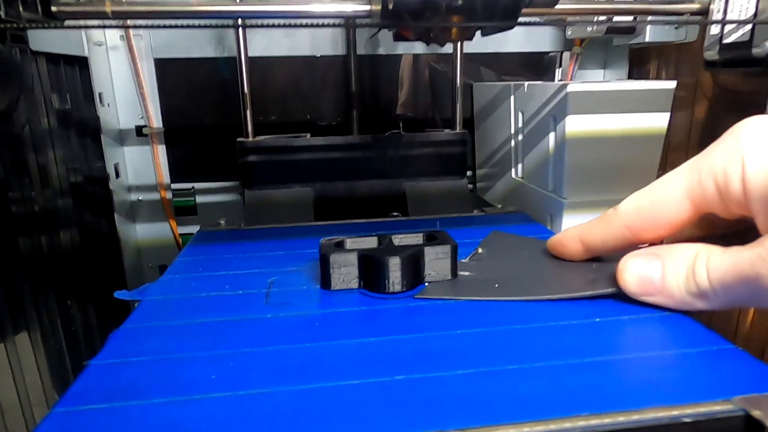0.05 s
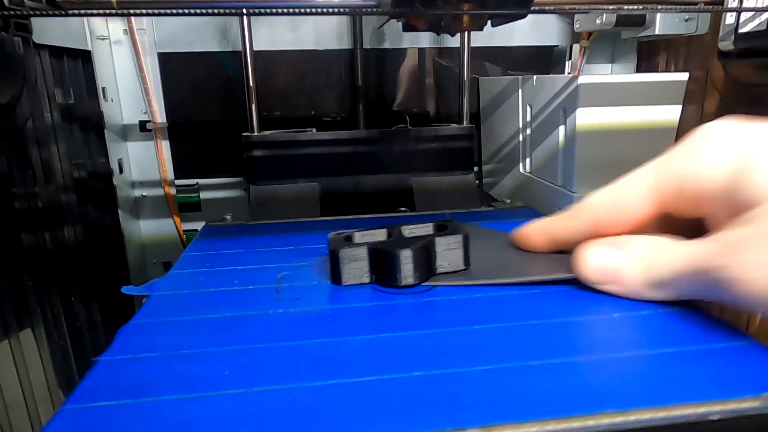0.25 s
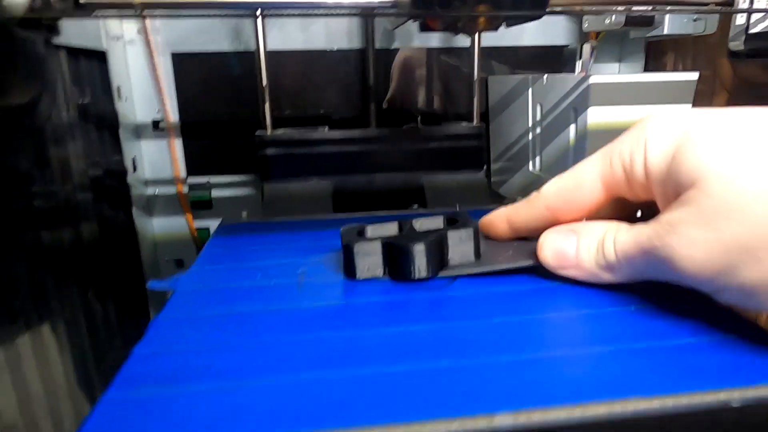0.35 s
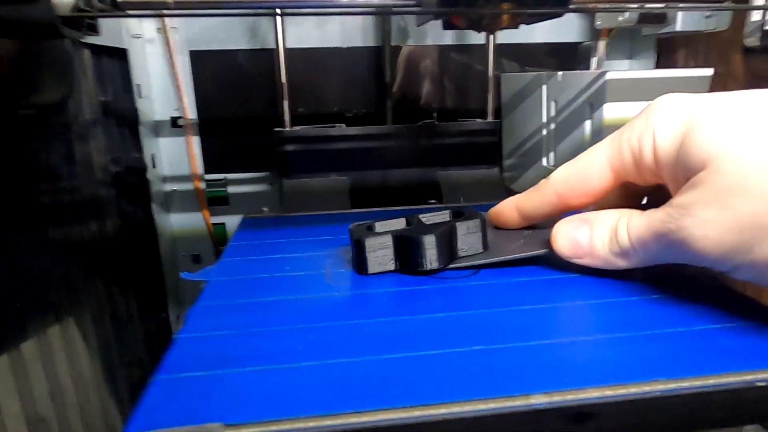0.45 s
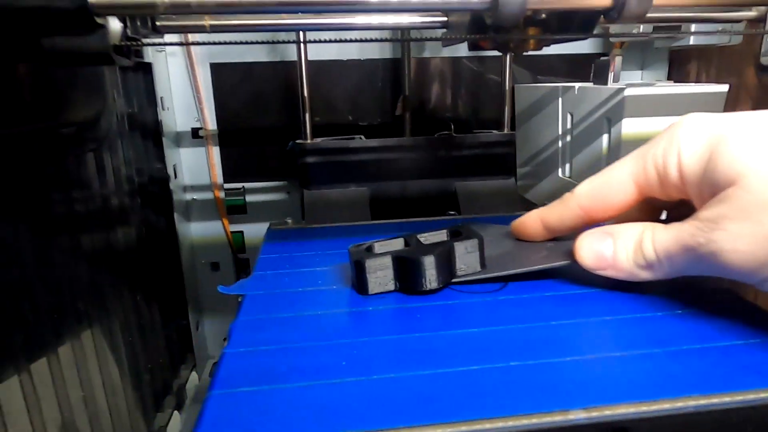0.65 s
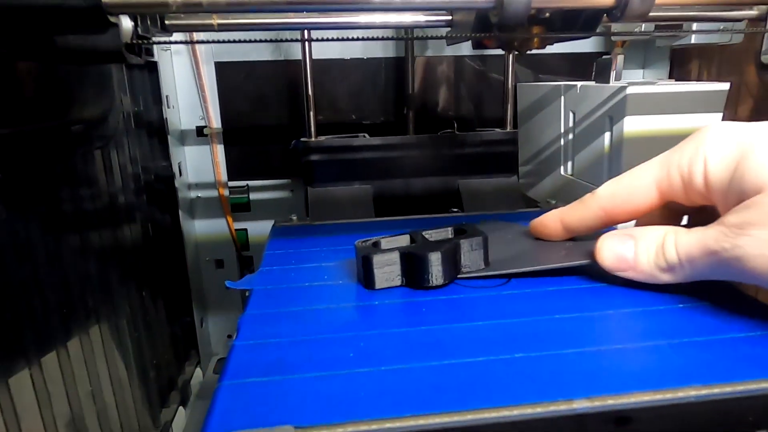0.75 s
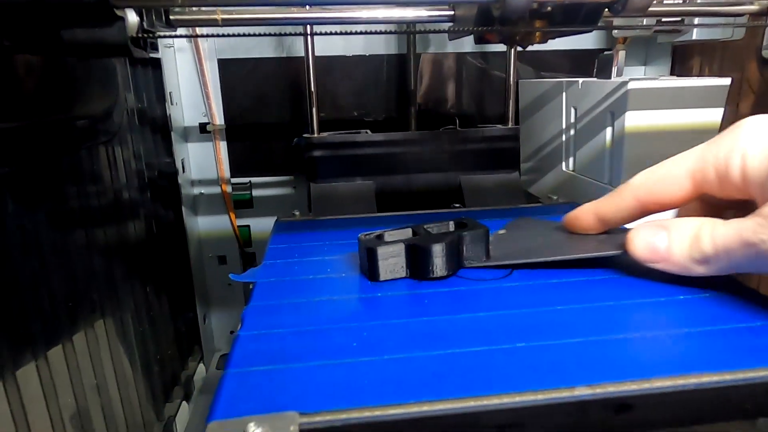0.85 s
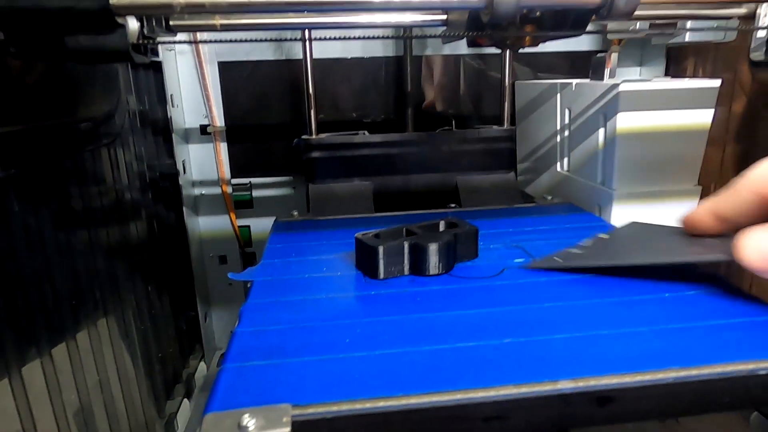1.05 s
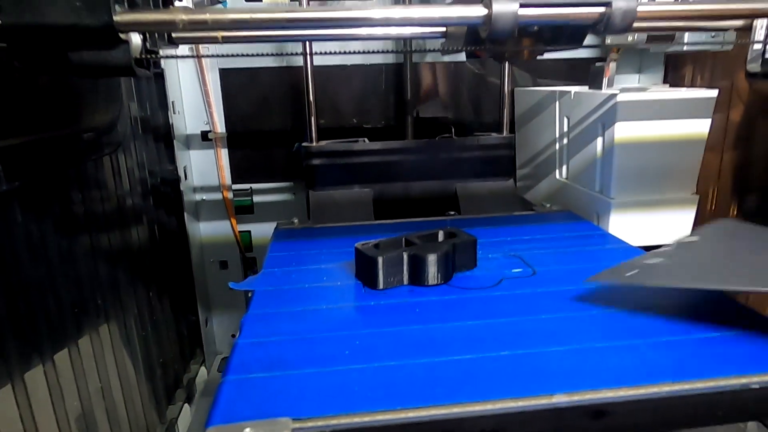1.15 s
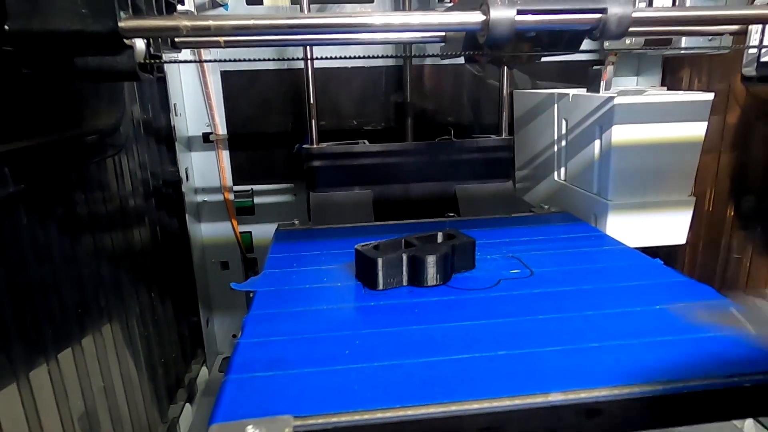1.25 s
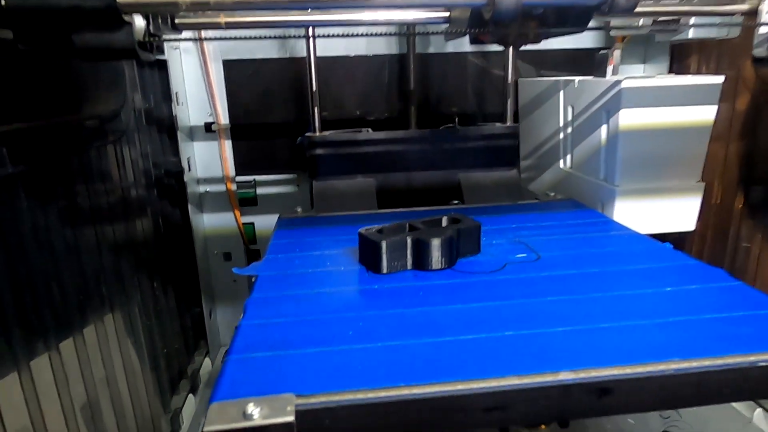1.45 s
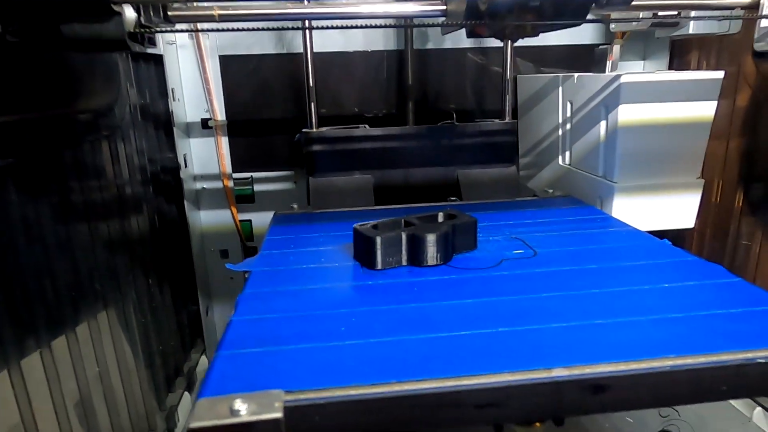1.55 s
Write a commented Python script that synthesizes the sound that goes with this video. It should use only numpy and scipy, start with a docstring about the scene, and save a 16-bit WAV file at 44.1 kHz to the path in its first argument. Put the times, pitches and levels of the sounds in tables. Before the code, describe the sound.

A scraper pries a plastic part off a printer bed with a crackling snap.

```python
"""Scraping a part off a 3D printer bed

A steel scraper wedges under a small plastic part stuck to the taped bed. The bond crackles in snaps and
tiny slips, then tears loose; the part judders, the frame rattles and the bed thumps on its springs.
The part taps down, and the blade drags back over the tape and clinks free with a thin squeal.
The printer's casing adds a brief echo, while its fans and motors hum underneath."""
import sys
import numpy as np
from scipy import signal
from scipy.fft import rfft, irfft
from scipy.io import wavfile

SR = 44100
rng = np.random.default_rng(int(sys.argv[2]) if len(sys.argv) > 2 else 0)


def bounce(signal):
    """Save signal as a 16-bit WAV file at the path given by the first command-line argument."""
    frames = np.transpose(np.atleast_2d(signal))
    limited = np.clip(frames, -1, 1)
    pcm = np.round(limited * 32767).astype(np.int16)
    wavfile.write(sys.argv[1], SR, pcm)


N = 70560
TAPS = 8192  # length of an object's ring in samples
T, HZ = np.arange(N) / SR, np.fft.rfftfreq(TAPS, 1 / SR)


def prying():
    """The bond cracks and grinds as the blade wedges in, ringing the pressed steel."""
    # Each row: start in seconds, level in dB, tilt in dB per octave, crumble in seconds, contact in Hz.
    cracks = [(.008, -14.5, -4, 0.013, 1800), (.0482, -11.5, -8, 0.002, 3700),
              (.0555, -11, -11.5, .001, 14000), (.068, -29, 5, 0.0036, 3300),
              (.083, -9, -6.5, 0.0087, 1500), (.093, -5.5, 7.5, 0.0052, 6500),
              (.107, -8.5, -1.5, 0.0061, 1600), (.138, -13, -6.5, 0.0062, 3800),
              (.1462, -8.5, -1, 0.00067, 12000), (.1635, -17.5, 14, .0006, 14000),
              (.2132, -0.5, 2, .0005, 3500), (.2428, -6, -2, .001, 3400), (.257, -9.5, 6.5, .004, 3500),
              (.2845, -21.5, 0.5, 0.004, 6500), (.296, -15, -0.5, .005, 10000),
              (.3295, -9.5, 0.5, 0.0026, 9800), (.343, -9.5, 4.5, .006, 3800), (.349, 0.5, 1, .005, 4800),
              (.3575, 4.5, 3, 0.00098, 10000), (.364, 8, -0.5, 0.0064, 6000), (.4445, -15, 5, .002, 13000),
              (.449, -6.5, 1, 0.0032, 10500)]
    # Friction of the push. Each row: time in seconds, level in dB.
    wedging = [(0, -58), (.04, -60), (.055, -38.5), (.1, -40.5), (.125, -52), (.16, -42.5), (.2, -45.5),
               (.26, -43.5), (.278, -47), (.3, -40), (.322, -42.5), (.36, -22), (.39, -35.5), (.42, -45),
               (.46, -35.5), (.5, -73.5)]
    # The blade's colour. Each row: frequency in Hz, level in dB.
    steel = [(100, -42), (600, -39.5), (1400, -10), (2400, -8), (3500, -0.5), (5300, -6), (6600, -2),
             (8000, -8.5), (10000, -4.5), (11400, -10.5), (13500, -10.5), (16000, -20)]
    # Its resonances under pressure. Each row: centre in Hz, width in Hz, lift in dB.
    modes = [(1420, 45, 12), (1690, 50, 9), (1960, 60, 3), (3200, 60, 6), (3390, 60, 9), (3880, 140, 7),
             (6140, 170, 3), (6720, 150, 3), (9630, 260, 1)]
    crackle = hits(cracks, steel, modes, crumble_db=-5, slips_per_s=6000)
    grind = rub(wedging, steel, modes, grains_per_s=3000, spread_db=4, clump_db=1.8, clump_hz=150)
    return crackle + grind


def part_knocks():
    """The loose plastic part chatters against blade and bed."""
    # Each row: start in seconds, level in dB, tilt in dB per octave, chatter in seconds, contact in Hz.
    knocks = [(.365, -6, -6.5, .007, 1260), (.379, 6, 6, 0.0064, 4630), (.392, 0.5, -4, 0.023, 1180),
              (.4555, 5.5, 2, 0.011, 3360), (.468, -6.5, -1.5, 0.0063, 1910),
              (.4795, 0.5, -8, 0.0066, 2780), (.538, -19.5, -12.5, 0.012, 3400),
              (.574, -18, -10, 0.0098, 3350), (.6845, -11.5, -7, 0.0028, 3340),
              (.729, -16.5, -9.5, 0.024, 2150), (.75, -10, -2.5, 0.01, 2230),
              (.8195, -15.5, -7.5, 0.0086, 1620)]
    # The part's colour. Each row: frequency in Hz, level in dB.
    plastic = [(100, -32.5), (400, -11), (900, -11.5), (1800, -9.5), (3300, -1), (5000, -3.5),
               (6500, -12.5), (8000, -27.5), (16000, -64)]
    # Its resonances. Each row: centre in Hz, width in Hz, lift in dB.
    modes = [(800, 45, 7), (1000, 50, 4), (1610, 50, 6), (2110, 55, 5), (2700, 60, 3), (3020, 45, 5),
             (3250, 80, 7), (3540, 60, 4), (4145, 60, 2), (5000, 150, 5), (5250, 60, 3)]
    return hits(knocks, plastic, modes, crumble_db=3, slips_per_s=6000)


def part_judder():
    """The part sticks and slips across the bed, ringing the plate."""
    # Each row: time in seconds, level in dB.
    judder = [(.17, -99), (.195, -35), (.23, -63), (.34, -60), (.365, -34.5), (.39, -25), (.41, -30),
              (.435, -28.5), (.46, -30.5), (.485, -29.5), (.505, -59), (.53, -51), (.62, -65)]
    # The plate's colour. Each row: frequency in Hz, level in dB.
    plate = [(60, -1.5), (200, 10), (400, 5), (650, 2.5), (1250, 1.5), (1800, -2), (3200, -4), (5000, -8),
             (7000, -12), (8500, -14), (16000, -32.5)]
    # Its resonances. Each row: centre in Hz, width in Hz, lift in dB.
    modes = [(1217, 35, 7), (1320, 35, 6), (1990, 40, 5), (2422, 30, 5), (2612, 30, 6), (3150, 30, 6),
             (3735, 40, 6), (4050, 35, 7), (4658, 35, 8), (4782, 40, 8), (6910, 35, 8)]
    return rub(judder, plate, modes, grains_per_s=4000, spread_db=3.5, clump_db=1.5, clump_hz=120)


def frame_rattle():
    """The frame rattles on after the jolt."""
    # Each row: time in seconds, level in dB.
    rattle = [(.36, -70), (.39, -58), (.45, -37.5), (.5, -36), (.54, -50.5), (.58, -55), (.62, -77)]
    # The frame's boxy colour. Each row: frequency in Hz, level in dB.
    frame = [(100, -25.5), (250, -8.5), (400, 4.5), (750, -3), (1100, -10.5), (2500, -26), (16000, -63.5)]
    # Its resonances. Each row: centre in Hz, width in Hz, lift in dB.
    modes = [(315, 30, 6.5), (403, 70, 3), (520, 25, 5), (680, 10, 3.9), (748, 14.25, 15), (1000, 8.3, 3)]
    return rub(rattle, frame, modes, grains_per_s=1300, spread_db=0.5, clump_db=1.5, clump_hz=60)


def blade_clinks(note_rise_s=0.0025):
    """Soft touches of the freed blade, each leaving a thin note set by where it is touched."""
    # Each row: start in seconds, level in dB, tilt in dB per octave, chatter in seconds,
    # note and contact in Hz, note level in dB, note t60 in seconds.
    touches = [(1.07, -14, 2.5, 0.0045, 3310, -45, 0.065), (1.081, -9, -1, .004, 3985, -41, 0.15),
               (1.089, -21, 9, 0.012, 2850, -44.5, 0.2), (1.14, -26.5, 13, 0.017, 4180, -49, 0.13),
               (1.187, -18, -13, 0.0054, 3850, -36.5, 0.049), (1.1923, -20.5, 4, 0.0054, 2825, -40, 0.14),
               (1.198, -22.5, 4, 0.0081, 5250, -52, 0.21), (1.229, -23.5, 8.5, 0.0094, 1996, -45.5, 0.092)]
    # The edge's colour. Each row: frequency in Hz, level in dB.
    edge = [(200, -33.5), (1500, -23), (2500, -7.5), (3200, 1.5), (4300, -5.5), (5400, -9), (7000, -7),
            (8500, -15), (16000, -35)]
    # Resonances of the free blade. Each row: centre in Hz, width in Hz, lift in dB.
    modes = [(2820, 60, 6), (3860, 140, 4), (5240, 33, 9.2), (5900, 35, 7.1), (6560, 33, 15)]
    out = hits([row[:5] for row in touches], edge, modes, crumble_db=4, slips_per_s=4100)
    attack = np.minimum(T / note_rise_s, 1)
    for start, _, _, _, hz, db, t60 in touches:
        add(out, start, amp(db - 60 * T / t60) * attack * np.sin(2 * np.pi * hz * T))
    return out


def air_gap(width_hz=330, upper_ratio=2.3, upper_db=-4.5):
    """Friction sounds the gap under the blade; the pitch climbs as drawing out shortens it."""
    # Each row: time in seconds, resonance in Hz, level in dB.
    gap = [(0.659, 1000, -64), (0.701, 980, -50.5), (0.761, 850, -56), (0.828, 800, -67),
           (0.901, 960, -52.5), (.96, 1290, -49.5), (1.015, 1565, -46), (1.044, 1750, -78),
           (1.07, 1750, -87)]
    times, hz, db = np.transpose(gap)
    pitch = np.interp(T, times, hz)
    lower = whistle(pitch, width_hz)
    upper = amp(upper_db) * whistle(pitch * upper_ratio, width_hz * upper_ratio)
    return (lower + upper) * level(np.transpose([times, db]))


def tape_slide():
    """The blade rasps over the tape as it is drawn back."""
    # Each row: time in seconds, level in dB.
    slide = [(.5, -58), (.63, -59.5), (.7, -51), (.76, -49), (.79, -55), (.87, -61), (.92, -49), (.96, -42),
             (.995, -35.5), (1.025, -41), (1.05, -47.5), (1.09, -50), (1.125, -51.5), (1.16, -55),
             (1.2, -47.5), (1.237, -48), (1.265, -74)]
    # The rasp's colour. Each row: frequency in Hz, level in dB.
    tape = [(100, -28), (600, -16.5), (1400, -7), (2400, -6), (3700, 0), (5500, -7), (6800, -10.5),
            (8000, -19), (12000, -24.5), (16000, -37.5)]
    # Its resonances. Each row: centre in Hz, width in Hz, lift in dB.
    modes = [(1426, 39.8, 3.8), (1625, 50, 8.1), (2177, 95, 3.6), (3120, 60, 5.6), (3600, 64, 5.4),
             (4640, 81, 4.3)]
    return rub(slide, tape, modes, grains_per_s=7000, spread_db=3.5, clump_db=1.5, clump_hz=67.7)


def edge_squeal():
    """The blade's edge sings thinly as it drags clear."""
    # Each row: time in seconds, level in dB.
    squeal = [(1.085, -57), (1.1, -46), (1.13, -63), (1.15, -52), (1.175, -65), (1.195, -74)]
    return whistle(hz=4110, width_hz=130) * level(squeal)


def bed_thumps(sway_hz, bounce_hz, sway_t60, bounce_t60, sway_db, bounce_db, shove_cycles=0.62):
    """Soft shoves rock the sprung bed, which rings on in a sway and a faster bounce."""
    # Each row: midpoint in seconds, strength in dB, centre in Hz.
    shoves = [(0.204, -27.5, 157), (0.282, -22.5, 160), (.383, -12.5, 152), (0.415, -13, 65),
              (.458, -20.5, 147), (0.481, -21.5, 150), (0.483, -25, 35), (0.528, -26, 148),
              (.53, -25.5, 54), (.575, -25, 146), (0.578, -31, 32.8), (0.669, -30, 44.8),
              (0.758, -36.5, 40), (0.888, -36.5, 46.7)]
    force = np.zeros(N)
    for midpoint, db, hz in shoves:
        cycles = (T - midpoint) * hz
        swell = np.exp(-(cycles / shove_cycles) ** 2 / 2)
        force -= amp(db) * swell * np.sin(2 * np.pi * cycles)
    out = force.copy()
    for hz, t60, db in [(sway_hz, sway_t60, sway_db), (bounce_hz, bounce_t60, bounce_db)]:
        fade = 1e-3 ** (T / t60)
        ring = 2 * fade / fade.sum() * np.cos(2 * np.pi * hz * T)
        out += amp(db) * signal.fftconvolve(force, ring)[:N]
    return out


def bed_tremble():
    """The bed keeps trembling under the hand."""
    # Each row: time in seconds, level in dB.
    tremble = [(0, -78), (.16, -48), (.28, -32.5), (.34, -37), (.45, -32), (.55, -34), (.63, -46),
               (.72, -42.5), (.82, -49), (1.0, -51), (1.25, -53), (1.4, -67.5), (1.6, -75)]
    return whistle(hz=143.2, width_hz=50) * level(tremble)


def casing(x, patterns=3, crossfade_hz=7, left_lag_s=.000026):
    """Direct sound from slightly right, plus short wall echoes, crossfaded so no pitch rings out."""
    # Each row: frequency in Hz, echo against direct sound in dB.
    echo_db = [(60, -26.5), (200, -28), (500, -13), (1500, -6), (4000, 1.5), (9000, 2), (16000, 1)]
    # Stereo lean. Each row: frequency in Hz, left minus right in dB.
    lean = [(100, -0.5), (1000, 2), (2500, 1), (3600, 1.5), (5400, -0.5), (7000, 4), (8600, -2), (10000, 3),
            (12500, -4.5), (14000, -2.5), (16000, -7)]
    echo = np.zeros((2, N))
    for k in range(patterns):
        crossfade = np.sqrt(2 / patterns) * np.cos(np.pi * (2 * crossfade_hz * T + k / patterns))
        echo += walls(x * crossfade)
    direct = shape(x, lambda f: np.exp(-2j * np.pi * np.outer([left_lag_s, 0], f)))
    echo_gain = lambda f: amp(read(echo_db, f))
    pan = lambda f: amp(np.outer([.5, -.5], read(lean, f)))
    wet = direct + shape(echo, echo_gain)
    return shape(wet, lambda f: pan(f) / np.sqrt(1 + echo_gain(f) ** 2))  # echoes add no net power


def walls(x, predelay_s=0.0009):
    """One pattern of dense, short reflections inside the casing, different at each ear."""
    # Each row: frequency in Hz, t60 in seconds.
    decay = [(100, .12), (1000, 0.15), (4000, 0.037), (9000, 0.022), (16000, .05)]
    t = T[:SR // 4]
    reflections = rng.choice([-1., 1.], (2, len(t))) * (t > predelay_s)
    hz, times, bands = signal.stft(reflections, SR, nperseg=128)
    t60 = read(decay, hz)[:, None]
    equal_energy = np.sqrt(2 * np.log(1000) / (t60 * SR))
    _, tail = signal.istft(bands * 1e-3 ** (times / t60) * equal_energy, SR, nperseg=128)
    return signal.fftconvolve(x[None], tail, axes=1)[:, :N]


def fans():
    """Fan and room noise, centred in the bass and wide in the treble."""
    # Each row: frequency in Hz, level in dB.
    colour = [(20, -6), (40, -11), (65, -3.5), (95, -12.5), (170, -10), (250, -16), (330, -11),
              (520, -27.5), (820, -26), (1100, -28), (1600, -28), (2200, -34.5), (3800, -37.5),
              (5000, -50.5), (9000, -55.5), (16000, -70)]
    # Each row: frequency in Hz, left-right likeness from 0 to 1.
    likeness = [(30, 0.92), (200, 0.97), (600, 0.9), (2000, 0.6), (6000, 0.35), (16000, 0.23)]
    # Each row: time in seconds, level in dB.
    swell = [(0, -47.5), (.3, -43), (.55, -46), (.9, -46.5), (1.3, -47), (1.6, -47.5)]
    centre = shape(rng.standard_normal(N), lambda f: np.sqrt(read(likeness, f)))
    sides = shape(rng.standard_normal((2, N)), lambda f: np.sqrt(1 - read(likeness, f)))
    air = shape(centre + sides, lambda f: amp(read(colour, f)))
    return unit(air) * level(swell)


def motors(hum_hz=59.3, waver_hz=1.2):
    """A low hum and faint wavering tones; one motor starts as the hum stops."""
    # The low hum. Each row: time in seconds, level in dB.
    hum_db = [(0, -43.5), (.3, -39), (.75, -48.5), (1.0, -44.5), (1.42, -47), (1.499, -59.5), (1.6, -71)]
    # The late motor's tones. Each row: pitch in Hz, relative level in dB.
    late_tones = [(176, 1.5), (344.5, -1.5)]
    # Its entrance. Each row: time in seconds, level in dB.
    late_db = [(1.44, -71), (1.47, -47.5), (1.53, -57), (1.57, -54.5), (1.6, -58)]
    # Steady motor and fan tones. Each row: pitch in Hz, level in dB.
    steady_tones = [(177.6, -59.5), (318.5, -62), (797, -69), (1588, -66.5), (2541, -73), (3060, -75.5),
                    (3935, -75.5), (10040, -88)]

    def tone(hz):
        pitch = hz + waver_hz * drift(8)
        return np.sqrt(2) * np.sin(2 * np.pi * np.cumsum(pitch) / SR)

    late = level(late_db) * sum(amp(db) * tone(hz) for hz, db in late_tones)
    hum = level(hum_db) * tone(hum_hz)
    return late + hum + sum(amp(db) * tone(hz) for hz, db in steady_tones)


def hits(rows, colour, modes, crumble_db, slips_per_s, contact_db=7, contact_octaves=.4):
    """Each hit is one snap and a dying shower of small slips, coloured by its contact resonance."""
    out, t = np.zeros(N), np.arange(SR // 20) / SR
    for start, db, tilt_db, crumble_s, contact_hz in rows:
        slips = rng.choice([-1, 1], len(t)) * (rng.random(len(t)) < slips_per_s / SR)
        force = amp(crumble_db) * slips * np.exp(-t / crumble_s)
        force[0] = 1  # the snap
        tilt = tilt_db * np.log2(np.maximum(HZ, 1000) / 1000)
        contact = contact_db * np.exp(-(np.log2((HZ + 1) / contact_hz) / contact_octaves) ** 2)
        sound = signal.fftconvolve(force, body(colour, modes, tilt + contact))
        add(out, start, amp(db) * sound / np.linalg.norm(sound))
    return out


def rub(curve, colour, modes, grains_per_s, spread_db, clump_db, clump_hz):
    """Stick-slip grains of uneven size arrive in clumps and ring the object."""
    size = amp(spread_db * np.minimum(rng.exponential(1, N), 4)) * rng.choice([-1, 1], N)
    slips = rng.random(N) < grains_per_s / SR
    grains = size * slips * amp(clump_db * drift(clump_hz))
    return signal.fftconvolve(unit(grains) * level(curve), body(colour, modes))[:N]


def body(colour, modes, extra_db=0):
    """An object's ring after one click: minimum phase, energy 1."""
    lift = 1 + sum(amp(db) ** 2 / (1 + (2 * (HZ - hz) / width) ** 2) for hz, width, db in modes)
    spectrum = amp(read(colour, HZ) + extra_db) * np.sqrt(lift)
    cepstrum = irfft(np.log(spectrum))
    causal = 2 * cepstrum[:TAPS // 2] * (np.arange(TAPS // 2) > 0)
    ring = irfft(np.exp(rfft(causal, TAPS)))
    return ring / np.linalg.norm(ring)


def whistle(hz, width_hz):
    """Noise of rms 1 in a resonance that may glide."""
    phase = 2 * np.pi * np.cumsum(hz * np.ones(N)) / SR
    return unit(drift(width_hz / 2) * np.cos(phase) + drift(width_hz / 2) * np.sin(phase))


def drift(rate_hz):
    """Smooth random wandering of rms 1."""
    return unit(shape(rng.standard_normal(N), lambda f: np.exp(-(f / rate_hz) ** 2)))


def shape(x, gain):
    """Filters by a gain given as a function of frequency."""
    return irfft(rfft(x, 2 * N) * gain(np.fft.rfftfreq(2 * N, 1 / SR)))[..., :x.shape[-1]]


def level(points):
    """Gain over time from a dB curve, fading fast beyond its ends."""
    times, db = np.transpose(points)
    outside_s = abs(T - np.clip(T, times[0], times[-1]))
    return amp(np.interp(T, times, db) - 600 * np.maximum(outside_s - .03, 0))


def read(points, hz):
    """Reads a table on a log-frequency axis."""
    f, value = np.transpose(points)
    return np.interp(np.log(hz + 1), np.log(f), value)


def add(mix, start_s, sound):
    """Mixes a sound in at its start time."""
    part = mix[max(round(start_s * SR), 0):][:len(sound)]
    part += sound[:len(part)]


def amp(db):
    """Decibels to gain."""
    return 10 ** (np.asarray(db) / 20)


def unit(x):
    """Scales to rms 1."""
    return x / np.sqrt(np.mean(x ** 2) + 1e-20)


def scene():
    """Wedging, breaking loose and withdrawing, inside the humming printer."""
    breaking = prying() + part_knocks() + part_judder() + frame_rattle()
    leaving = blade_clinks() + air_gap() + tape_slide() + edge_squeal()
    thumps = bed_thumps(sway_hz=35.6, bounce_hz=142.4, sway_t60=0.41, bounce_t60=0.42,
                        sway_db=2.5, bounce_db=-0.5)
    return casing(breaking + leaving + thumps + bed_tremble()) + fans() + motors()


def record(dry):
    """A steep low-pass trims the very top of the treble."""
    lowpass = signal.firwin(401, cutoff=16100, window=("kaiser", 8), fs=SR)
    return signal.oaconvolve(dry, lowpass[None], "same")


dry = scene()
out = record(dry)
bounce(out)
```